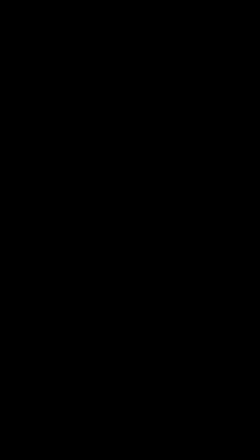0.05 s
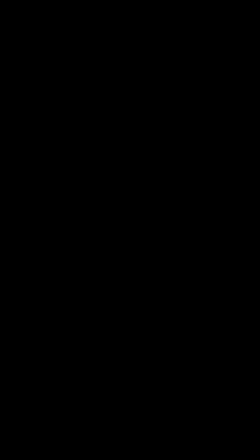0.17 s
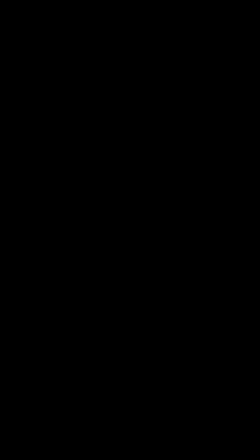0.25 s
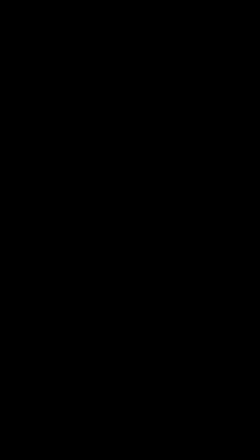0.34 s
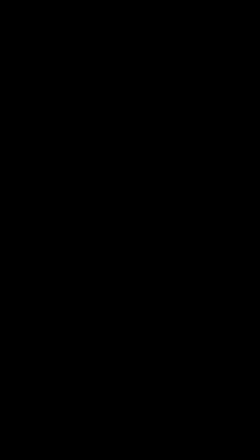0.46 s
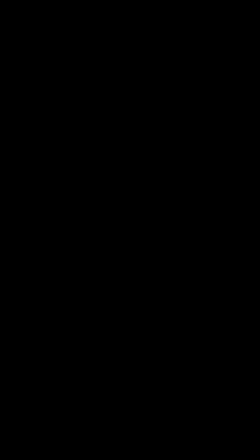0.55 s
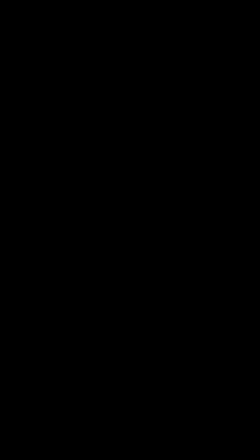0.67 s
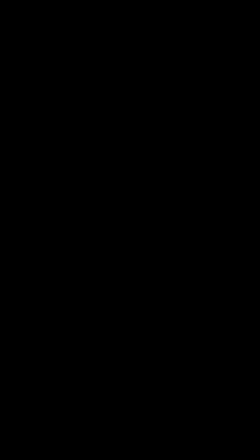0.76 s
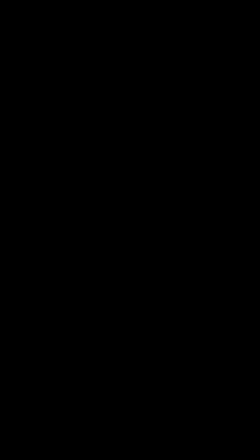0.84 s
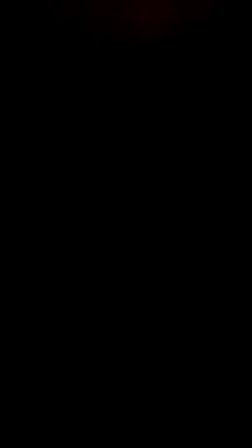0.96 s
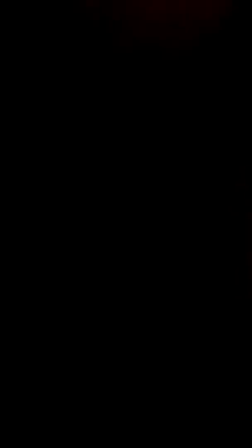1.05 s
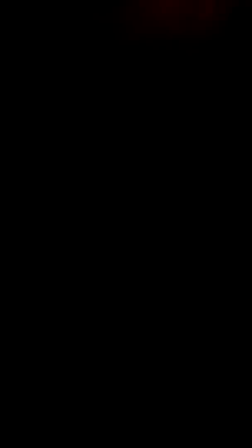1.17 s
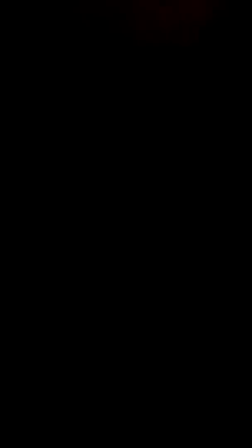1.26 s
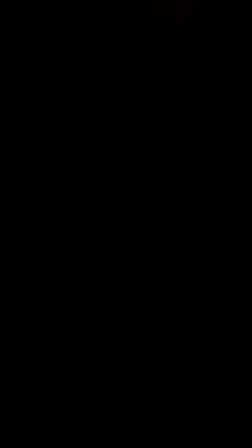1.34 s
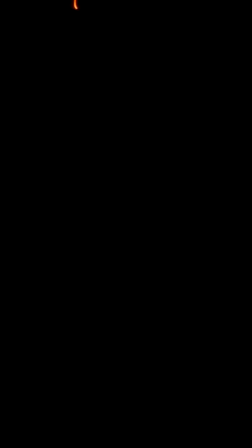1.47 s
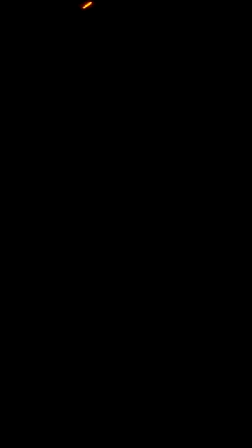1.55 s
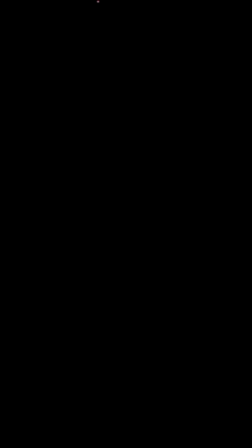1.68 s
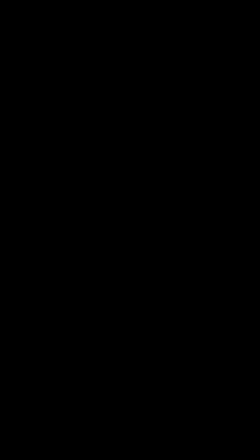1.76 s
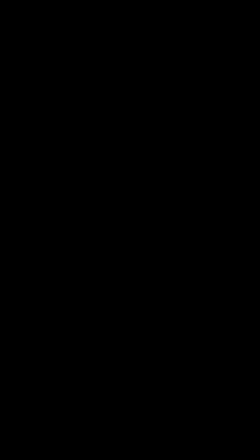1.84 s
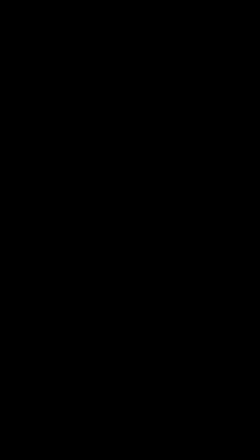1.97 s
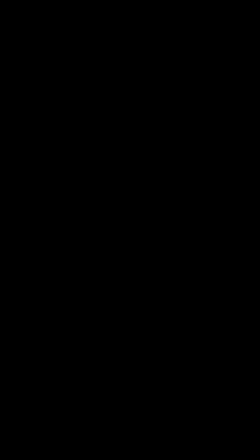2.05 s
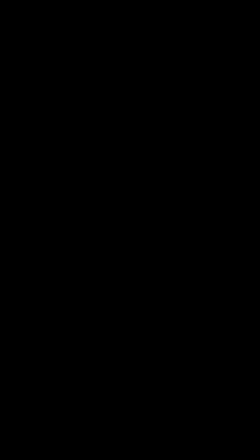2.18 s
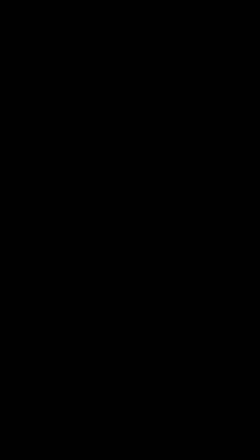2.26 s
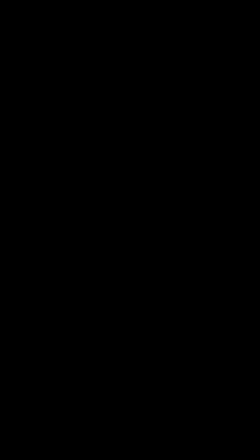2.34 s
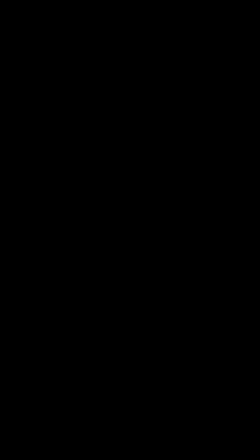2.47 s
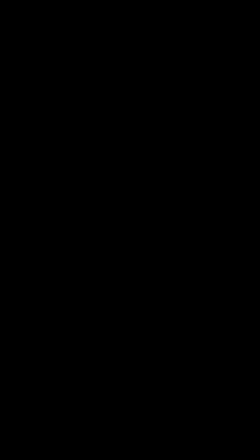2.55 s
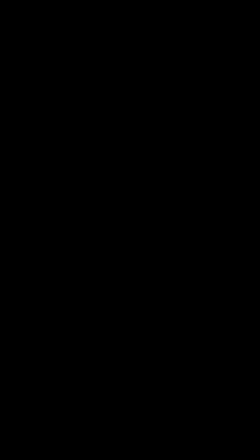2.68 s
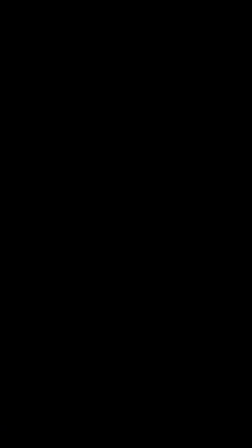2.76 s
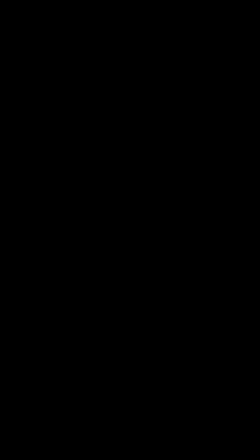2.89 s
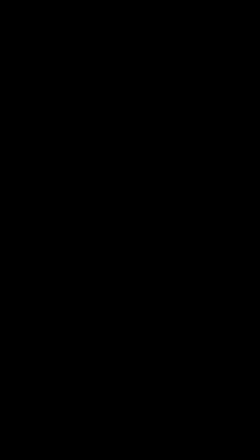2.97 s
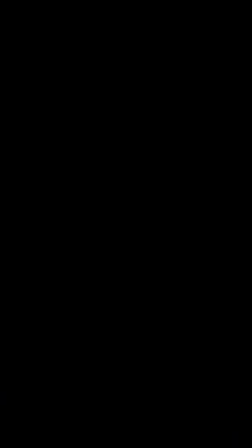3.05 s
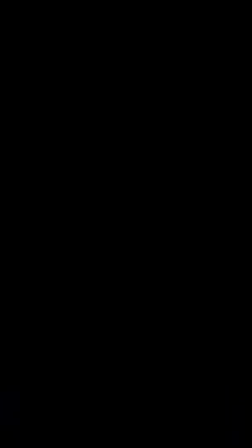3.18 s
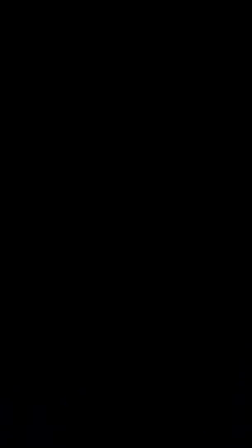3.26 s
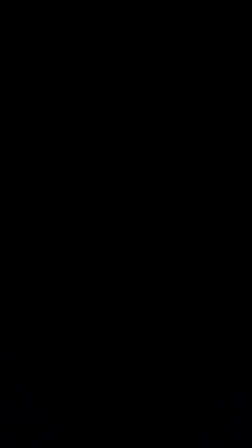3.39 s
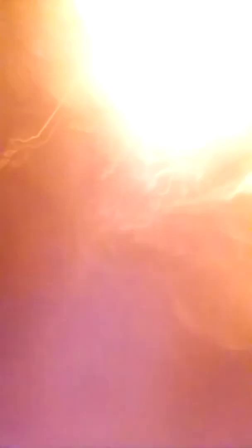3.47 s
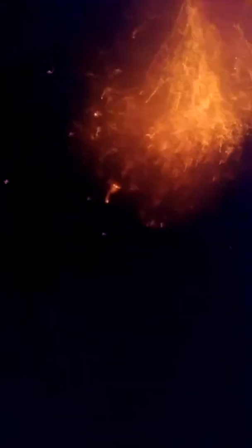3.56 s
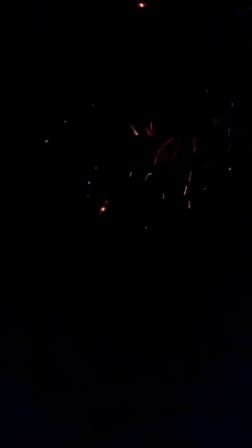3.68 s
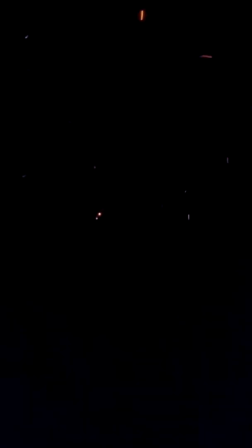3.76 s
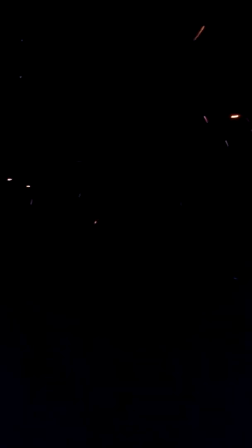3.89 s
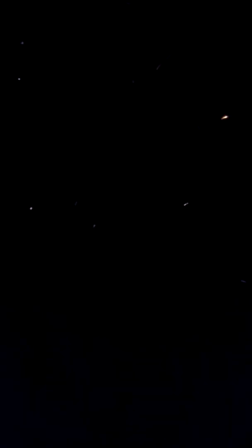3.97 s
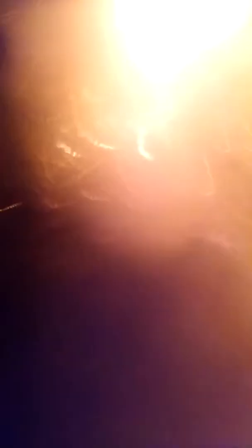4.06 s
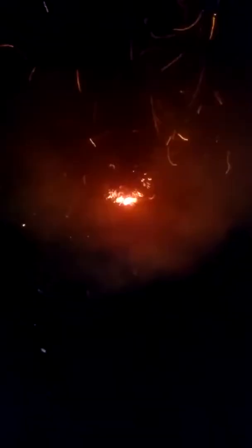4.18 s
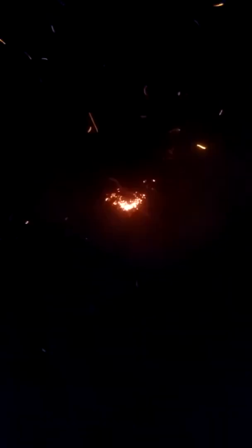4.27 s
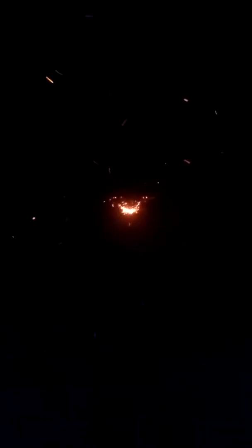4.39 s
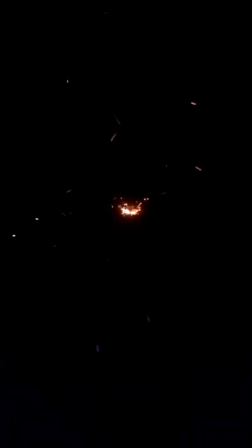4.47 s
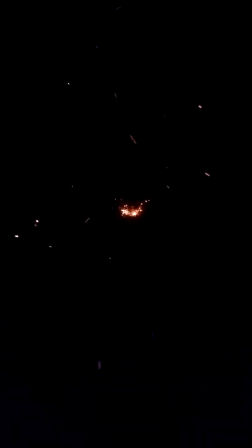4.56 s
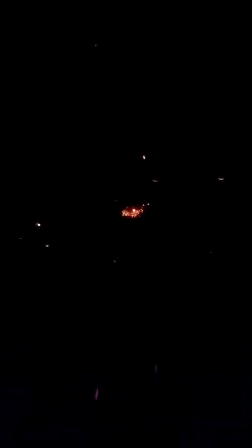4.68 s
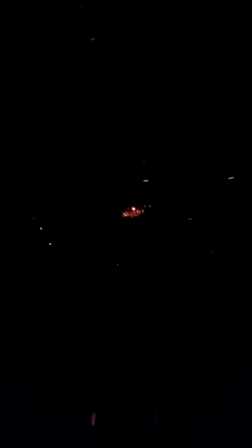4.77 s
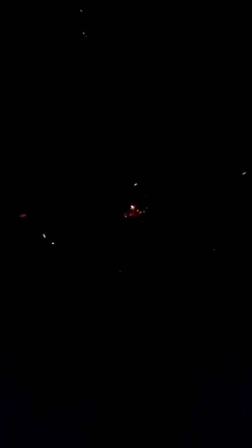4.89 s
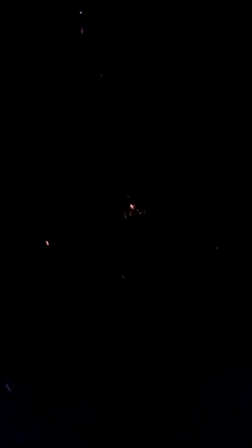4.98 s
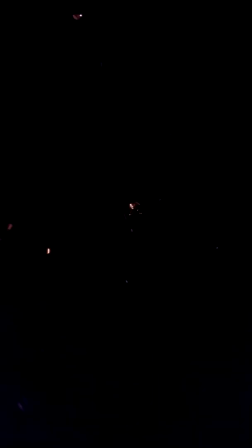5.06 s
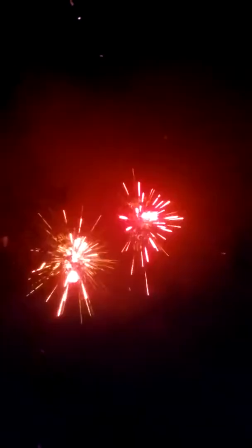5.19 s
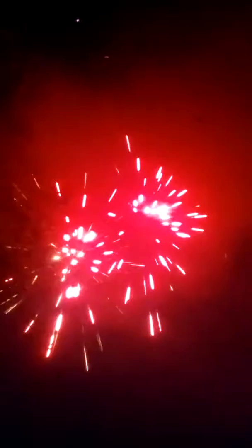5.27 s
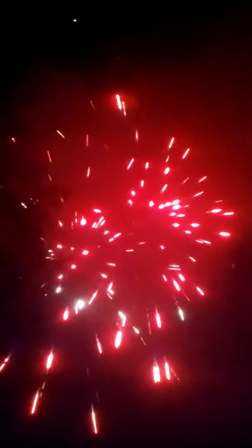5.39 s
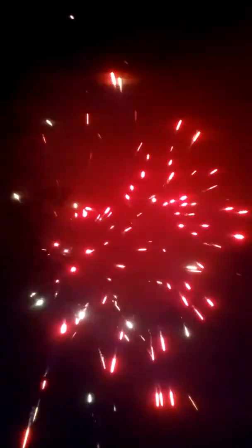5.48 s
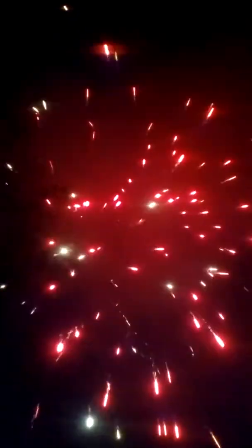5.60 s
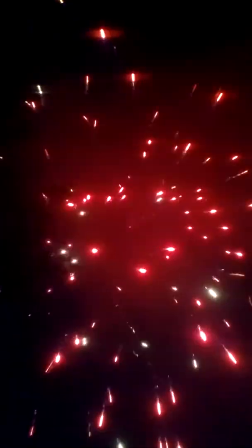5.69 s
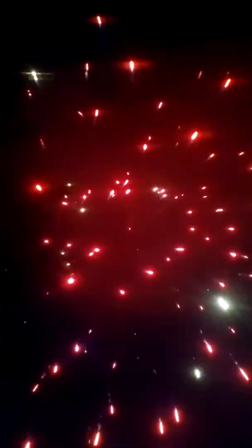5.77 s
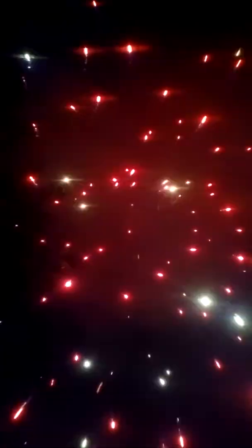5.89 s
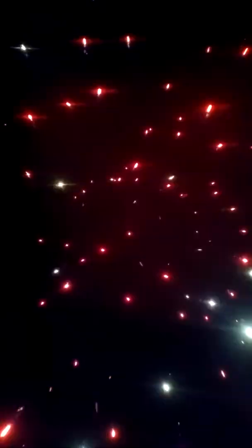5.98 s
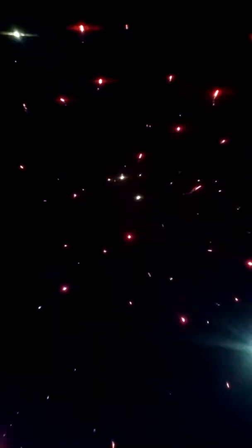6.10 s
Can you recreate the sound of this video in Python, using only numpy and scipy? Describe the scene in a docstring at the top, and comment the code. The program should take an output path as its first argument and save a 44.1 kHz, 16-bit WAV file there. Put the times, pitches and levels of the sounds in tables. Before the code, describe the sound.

A firework fizzes and sputters close by, fires two sharp bangs with rushing powder, then bursts in a roar that slowly fades.

```python
"""Fizzing and coughing, two bangs, a faint smoulder, then a burst that roars away: a firework at night.
It burns on the ground a few metres off; gas jets through its cardboard tube, which resonates.
Two charges go off, each followed by a rush of burning powder; last, a shell throws out burning stars.
The pressure of the charges pins the microphone against its stops: the sound chokes after each bang."""
import sys
import numpy as np
from scipy import signal
from scipy.fft import rfft, irfft, next_fast_len
from scipy.io import wavfile

SR = 44100
rng = np.random.default_rng(int(sys.argv[2]) if len(sys.argv) > 2 else 0)


def wav_out(sig):
    """Save sig, one row per channel (or a flat mono array), as 16-bit PCM at SR to the path in sys.argv[1]."""
    wavfile.write(sys.argv[1], SR, np.round(np.clip(np.atleast_2d(sig).T, -1, 1) * 32767).astype(np.int16))


N = 270628
TIME_S = np.arange(N) / SR
FFT_SIZE = next_fast_len(N)
FREQ_HZ = np.maximum(np.arange(FFT_SIZE // 2 + 1) * SR / FFT_SIZE, 1)

# Lowest tube resonance, sinking as it burns hollow. Each row: time in seconds, pitch in Hz.
BOOM_PITCH = [(1, 487.4), (2.1, 519.7), (3, 476), (4.1, 448.8)]
# Resonances of the fresh tube, deep-burnt tube and stub. Each row: centre in Hz, width in Hz, gain in dB.
FRESH_MODES = [(980, 180, 4), (1870, 170, 7), (2220, 110, -8), (2980, 500, 6.5), (3460, 200, -12),
               (4120, 180, 6), (4850, 220, -3), (5380, 690, 6), (6000, 160, -11), (6480, 800, 7.5),
               (8500, 400, -4), (9200, 700, 4.5), (10600, 560, 8), (11400, 600, -1)]
DEEP_MODES = [(1030, 220, 4.5), (1487, 290, -9), (1840, 440, 6.5), (2350, 250, -8), (2616, 280, 11),
              (3110, 410, 8.5), (3450, 160, -12), (3960, 320, 6), (5060, 180, 1), (5630, 520, 7),
              (5950, 210, -9.5), (6700, 920, 2.5), (9200, 700, 2), (10700, 600, 5.5)]
STUB_MODES = [(813, 244, 10.5), (1140, 170, -4), (1300, 110, 5.5), (1630, 120, 8), (2120, 200, 2),
              (2600, 200, -7), (2922, 79, 11.5), (3450, 120, 7.5), (4160, 230, 5.5)]
# Source spectra. Each row: frequency in Hz, relative level in dB.
EMBER_SPECTRUM = [(30, -1), (90, 8.5), (220, -6), (500, -15), (1200, -19), (2800, -15), (4200, -26),
                  (7000, -28), (8200, -43), (16000, -44)]
FLUTTER_SPECTRUM = [(25, -6.5), (60, 14.5), (110, 0), (200, 0.5), (320, 7), (500, -1.5), (800, -13),
                    (2000, -35.5)]
ROAR_SPECTRUM = [(200, -9), (500, 4), (800, -6), (1400, -3), (2000, -6), (2500, -13), (4000, -52)]
HISS_SPECTRUM = [(1500, -26), (2400, -4.5), (4200, 3), (5600, -1.5), (6700, -9.5), (7300, -25.5),
                 (9000, -37)]
SIZZLE_SPECTRUM = [(5000, -23.5), (7200, 4.5), (9000, -2), (10500, -13), (13000, -16.5), (16000, -18)]
RUSH_1_SPECTRUM = [(18, -63), (30, -40.5), (81, 13), (145, -6.5), (303, -2), (394, -9.5), (461, -12.5),
                   (512, -11.5), (1100, -14.5), (1720, -10.5), (2480, -13), (3770, -6.5), (5170, -1.5),
                   (14000, -32), (16000, -60)]
RUSH_2_SPECTRUM = [(18, -70.5), (30, -39.5), (59, -17.5), (160, 2), (449, -8), (721, -14), (889, -8.5),
                   (1100, -12), (1630, -11), (2540, -9), (2900, -8.5), (4190, -3.5), (5450, 0.5),
                   (11700, -30.5), (16000, -52)]
SHELL_SPECTRUM = [(30, -11), (100, -14), (200, -9), (300, -4), (460, -1.5), (650, -5), (850, -10),
                  (1200, -11), (1700, -7), (2500, -8.5), (4200, -6), (5700, -5), (8500, -25), (11000, -38),
                  (16000, -44)]
CRACK_SPECTRUM = [(30, -16.5), (120, -6), (350, 4), (750, 0.5), (1200, -12.5), (1900, -8), (3500, -9.5),
                  (5500, -10.5), (8000, -25.5), (16000, -20)]
# Decay by band. Each row: frequency in Hz, T60 in seconds.
RUSH_T60 = [(70, 0.54), (250, 0.71), (900, 0.91), (2500, .95), (5000, 0.69), (10000, 0.43)]
SHELL_T60 = [(70, 2.5), (450, 2.72), (1200, 1.91), (3000, 1.57), (5500, 1.254), (8500, 1.02), (13000, 0.64)]
# Gas flow through the tube. Each row: time in seconds, level in dB.
GAS_FLOW = [(0.02, -57), (0.09, -61), (0.18, -56), (0.21, -39.5), (0.42, -39.5), (0.47, -28.5),
            (0.49, -38.5), (0.6, -33.5), (0.64, -44.5), (0.69, -35), (0.87, -35.5), (1.22, -48.5),
            (1.76, -46), (1.83, -51.5), (2.04, -45), (2.36, -47.5), (2.37, -43.5), (2.68, -49.5),
            (2.7, -44.5), (2.85, -49.5), (2.88, -42.5), (3.07, -44), (3.21, -43.5), (3.54, -48)]
# Jet voices. Each: level at full flow in dB, dB per dB of flow, drift in dB per second.
FLUTTER_LAW = (-39, 0.33, -2.34)
ROAR_LAW = (-35, 0.59, -1.14)
HISS_LAW = (-36.5, 1, -0.13)
SIZZLE_LAW = (-49.5, 0.82, -5.5)
# Breathy notes of jet and stub. Each row: crest in seconds, half-length in seconds, pitch in Hz,
# glide in Hz per second, width in Hz, level in dB.
JET_NOTES = [(.04, 0.48, 1900, -6, 260, -45.5), (1.2, .45, 3180, 690, 260, -50),
             (1.83, 0.33, 1118, 101.5, 130, -42.5), (2.29, 0.5, 1055, -170, 132, -45),
             (2.46, 0.31, 2810, 301, 250, -51), (2.905, 0.076, 3980, -1, 450, -47),
             (3.35, .45, 2717, -220, 260, -48.5), (3.4, .45, 944, -350, 130, -48.5),
             (3.394, 0.036, 1570, 0, 700, -40), (4.9, 0.55, 2110, 300, 50.5, -60),
             (5.1, 0.25, 3110, -300, 200, -62), (5.3, 0.16, 2330, -1200, 50.3, -62)]
# Single sparks. Each row: start in seconds, relative level in dB.
SPARK_TICKS = [(1.214, -31), (4.969, -40), (5.092, -42), (5.117, -48), (5.224, -38), (5.234, -49.5),
               (5.353, -38), (5.960, -33), (6.025, -24), (6.062, -23), (6.125, -23)]
# Short pops and thumps: coughs of gas, and a snap as the second bang chokes the microphone.
# Each row: start in seconds, envelope peak in dB, pitch in Hz, cycles to the crest.
SHORT_POPS = [(0.167, -13.5, 157, 0.3), (0.189, -14.5, 170, 0.13), (1.2149, -21, 800, 0.27),
              (1.6851, -11.5, 152, 0.16), (1.7, -19, 200, 0.48), (1.715, -9.5, 396, 0.11),
              (1.739, -8.5, 533, 0.46), (2.667, -12.5, 246, 0.38), (2.698, -19, 300, 0.2),
              (2.735, -19, 170, 0.18), (3.3148, -8.5, 437, 0.37), (3.3398, -4, 573, 0.44),
              (3.755, -6, 196.5, 0.59), (3.81, -14.5, 147, 0.85), (4.223, 2.5, 300, 0.07),
              (5.342, -32, 750, 0.44), (5.361, -36, 300, 0.71), (5.943, -18, 520, 0.28),
              (6.043, -19, 480, 0.45)]
# Slow blast pressure. Each row: crest, rise and fall in seconds, pressure in full scales (suction < 0).
PRESSURE_SWINGS = [(3.675, .084, .001, -12), (3.6762, .001, .026, 4.5), (3.765, .035, .018, -.75),
                   (4.168, .024, .06, -5), (4.243, .025, .03, 2.6), (4.317, .033, .092, -1.35),
                   (5.405, .008, .02, -.6)]
# Powder flares. Each row: start in seconds, level in dB, rise and swell time in seconds,
# T60 factor, share of stub resonance.
POWDER_RUSHES = [(3.688, -2, .004, 0.22, 1.03, 0.13), (4.251, 0.5, 0.0038, 0.21, 0.98, 0.6)]
# Detonations. Each row: start in seconds, level in dB, then rise, length and T60 in seconds.
DETONATIONS = [(3.588, -2.5, 0.0064, 0.019, 0.017), (3.713, -10.5, 0.0019, 0.01, 0.13),
               (4.137, -0.5, 0.0015, 0.013, 0.024), (4.261, -10, 0.0071, 0.022, 0.036),
               (5.373, -4, 0.0014, 0.0056, 0.05), (5.391, -1.5, 0.00048, 0.0031, 0.099)]


def undb(db):
    """Decibels to gain."""
    return 10 ** (np.asarray(db) / 20)


def curve(rows):
    """Linear interpolation of (seconds, value) rows."""
    return np.interp(TIME_S, *np.transpose(rows))


def decay(age_s, t60_s):
    """1 until age 0, then 60 dB down per T60."""
    return undb(-60 * np.maximum(age_s, 0) / t60_s)


def swell(crest_s, rise_s, fall_s):
    """Smooth hump, 1 at the crest."""
    age_s = TIME_S - crest_s
    position = np.where(age_s < 0, age_s / rise_s, age_s / fall_s)
    return np.cos(np.pi / 2 * np.clip(position, -1, 1)) ** 2


def burning(out_s=4.6, dying_s=0.22):
    """1 while the tube burns, 0 once blown out."""
    return np.clip((out_s - TIME_S) / dying_s, 0, 1)


def noise():
    """White noise."""
    return rng.standard_normal(N)


def walk(rate_hz):
    """Slow random wander, spread near 1."""
    hop = max(int(SR / rate_hz), 1)
    steps = noise()[:N // hop + 2]
    return np.interp(np.arange(N) / hop, np.arange(len(steps)), steps) * np.sqrt(3 / 2)


def grains(rate_hz, spread_db):
    """Dense random clicks of unequal size; rms 1."""
    clicks = (rng.random(N) < rate_hz / SR) * noise()
    clicks *= undb(spread_db * np.minimum(rng.exponential(size=N), 4))
    return clicks / clicks.std()


def breathy(hz, width_hz):
    """Narrow noise band following a pitch; rms 1."""
    sway = signal.sosfilt(signal.butter(2, width_hz / 2, fs=SR, output="sos"), noise() + 1j * noise())
    note = np.real(sway * np.exp(2j * np.pi * np.cumsum(hz) / SR))
    return note / note.std()


def colour(x, spectrum, modes=(), share=1):
    """Filter by (Hz, dB) rows plus resonances; rms 1."""
    hz, db = np.transpose(spectrum)
    db = np.interp(np.log(FREQ_HZ), np.log(hz), db)
    for centre_hz, width_hz, gain_db in modes:
        db += share * gain_db * .5 ** ((2 * (FREQ_HZ - centre_hz) / width_hz) ** 2)
    shaped = irfft(rfft(x, FFT_SIZE) * undb(db), FFT_SIZE)[:N]
    return shaped / shaped.std()


def fade(x, start_s, rise_s, band_t60):
    """Linear rise; each band decays at its own rate."""
    age_s = np.maximum(TIME_S - start_s, 0)
    spectrum = rfft(x, FFT_SIZE)
    hz, t60s = np.transpose(band_t60)
    out = 0
    for band, t60_s in zip(np.eye(len(hz)), t60s):
        weight = np.interp(np.log(FREQ_HZ), np.log(hz), band)
        out += irfft(spectrum * weight, FFT_SIZE)[:N] * decay(age_s, t60_s)
    return out * np.minimum(age_s / rise_s, 1)


def night_air():
    """Faint, dull background noise."""
    return undb(-81) * colour(noise(), [(30, -17), (100, -0.5), (1000, -14), (16000, -30)])


def ember(crest_s=4.64, rise_s=0.25, level_db=-38.5, fade_db_per_s=22.5):
    """The open stub smoulders and fades."""
    age_s = TIME_S - crest_s
    envelope = np.clip(1 + age_s / rise_s, 0, 1) * undb(level_db - fade_db_per_s * np.maximum(age_s, 0))
    return colour(noise(), EMBER_SPECTRUM, STUB_MODES) * envelope


def tube_notes(boom_crest_s=3.78, swell_db_per_s=6, fade_db_per_s=12):
    """Gas blowing across the tube: a boom that grows as it hollows out, and brief gliding notes."""
    age_s = TIME_S - boom_crest_s
    boom_db = -32.5 + np.minimum(swell_db_per_s * age_s, -fade_db_per_s * age_s)
    out = breathy(curve(BOOM_PITCH), width_hz=108) * undb(boom_db) * burning()
    for crest_s, half_s, hz, glide_hz_per_s, width_hz, db in JET_NOTES:
        note = breathy(hz + glide_hz_per_s * (TIME_S - crest_s), width_hz)
        out += note * undb(db) * swell(crest_s, half_s, half_s)
    return out


def fizz(full_flow_db=-35, deepens_at_s=0.97, deepening_s=1):
    """Sputtering gas leaves the tube; the resonances change as the flame sinks in."""
    flow_db = curve(GAS_FLOW) - full_flow_db
    flutter_db, roar_db, hiss_db, sizzle_db = (
        db + follow * flow_db + drift_db_per_s * TIME_S
        for db, follow, drift_db_per_s in (FLUTTER_LAW, ROAR_LAW, HISS_LAW, SIZZLE_LAW))
    depth = np.clip((TIME_S - deepens_at_s) / deepening_s, 0, 1)
    sputter_db = 1.1 * walk(rate_hz=45) + .7 * walk(rate_hz=12)
    out = colour(noise(), FLUTTER_SPECTRUM) * undb(flutter_db)
    for spectrum, db in (ROAR_SPECTRUM, roar_db), (HISS_SPECTRUM, hiss_db), (SIZZLE_SPECTRUM, sizzle_db):
        gas = noise() + grains(rate_hz=2500, spread_db=4)
        fresh = np.sqrt(1 - depth) * colour(gas, spectrum, FRESH_MODES)
        deep = np.sqrt(depth) * colour(gas, spectrum, DEEP_MODES)
        out += (fresh + deep) * undb(db + sputter_db)
    return out * burning()


def sparks(tau_s=0.002):
    """Lone metal grains snap with a tiny tick."""
    envelope = sum(undb(db) * (TIME_S >= start_s) * np.exp(-np.abs(TIME_S - start_s) / tau_s)
                   for start_s, db in SPARK_TICKS)
    snap = colour(noise(), [(300, 20), (1500, 8), (5500, 4), (7500, -3), (15000, -27)])
    return undb(-1.5) * envelope * snap


def pops(echo_db=-11.5, echo_delay_s=.012):
    """Each pop is a pressure swing or two; the surroundings return a dull murmur."""
    out = np.zeros(N)
    age_s = TIME_S[:SR // 10]
    for start_s, db, hz, cycles in SHORT_POPS:
        progress = age_s * hz / cycles
        pop = undb(db) * progress * np.exp(1 - progress) * np.sin(2 * np.pi * hz * age_s)
        i = int(start_s * SR)
        out[i:i + len(pop)] += pop[:N - i]
    tail = (noise() * decay(TIME_S, t60_s=1.1) * (TIME_S > echo_delay_s))[:SR]
    return out + undb(echo_db) * signal.fftconvolve(out, tail / np.linalg.norm(tail))[:N]


def blast_wind():
    """Slow pull and push of the charges, shaken by turbulence."""
    pressure = sum(peak * swell(*timing_s) for *timing_s, peak in PRESSURE_SWINGS)
    return pressure * undb(1.6 * walk(rate_hz=330))


def rushes(swell_db=9):
    """Loose powder flares from the stub after each charge, spreads and burns away over a rumble."""
    out = 0
    for row, spectrum in zip(POWDER_RUSHES, (RUSH_1_SPECTRUM, RUSH_2_SPECTRUM)):
        start_s, db, rise_s, swell_s, stretch, share = row
        flare = colour(noise() + .5 * grains(rate_hz=3000, spread_db=1.5), spectrum, STUB_MODES, share)
        rumble = undb(-4.5) * colour(noise(), [(20, -13), (50, 3.5), (110, -8), (200, -17), (600, -53)])
        unlit = np.clip(1 - (TIME_S - start_s) / swell_s, 0, 1)
        band_t60 = [(hz, stretch * t60_s) for hz, t60_s in RUSH_T60]
        out += undb(db - swell_db * unlit) * fade(flare + rumble, start_s, rise_s, band_t60)
    return out


def shell(start_s=5.374, rise_s=0.073, stars_db=-0.48, sizzle_db=-48):
    """Burning stars fly out; their hiss dies first, leaving a grainy roar and a faint sizzle."""
    stars = colour(noise() + 0.14 * grains(rate_hz=900, spread_db=-1), SHELL_SPECTRUM)
    sizzle = colour(grains(rate_hz=1500, spread_db=2),
                    [(3000, -20), (7000, 3), (10000, -3), (16000, -13)])
    sizzle *= (TIME_S > start_s) * decay(TIME_S - start_s, t60_s=3.3)
    return undb(stars_db) * fade(stars, start_s, rise_s, SHELL_T60) + undb(sizzle_db) * sizzle


def bangs(bark_db=0.5, bark_t60_s=0.018):
    """Each detonation: a short tearing crack, opening with the bark of the splitting paper case."""
    crack_gain, bark_gain = 0, 0
    for start_s, db, rise_s, length_s, t60_s in DETONATIONS:
        age_s = TIME_S - start_s
        onset = undb(db) * np.clip(age_s / rise_s, 0, 1)
        crack_gain += onset * decay(age_s - length_s, t60_s)
        bark_gain += onset * decay(age_s - rise_s, bark_t60_s)
    crack = colour(noise(), CRACK_SPECTRUM)
    bark = colour(noise(), [(250, -22.5), (600, 0.5), (1700, -5.5), (3200, -23.5), (8000, -41.5)])
    return crack_gain * crack + undb(bark_db) * bark_gain * bark


def scene():
    """All sources at the microphone, mono."""
    powder = (rushes() + shell()) * undb(.5 * walk(rate_hz=80))  # the level flickers
    night = night_air()
    sputtering = fizz() + tube_notes() + pops() + sparks()
    return (night + sputtering + powder + bangs() + ember() + blast_wind())[None]


def record(dry):
    """The diaphragm stiffens toward its stops, leaks slow pressure and rings faintly in its port."""
    stop, leak_hz, port_hz, top_hz = 0.65, 135, 4080, 16000
    swing = dry / (1 + (dry / stop) ** 8) ** (1 / 8)
    swing = signal.sosfilt(signal.butter(3, leak_hz, "high", fs=SR, output="sos"), swing)
    port = signal.lfilter(*signal.iirpeak(port_hz, Q=30, fs=SR), swing)
    clipped = np.clip(swing - 2 * port, -1, 1)
    return signal.sosfilt(signal.ellip(8, .2, 70, top_hz, fs=SR, output="sos"), clipped)


dry = scene()
out = record(dry)
wav_out(out)
```